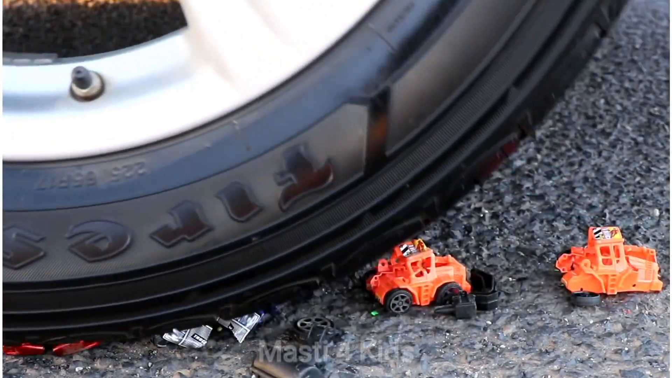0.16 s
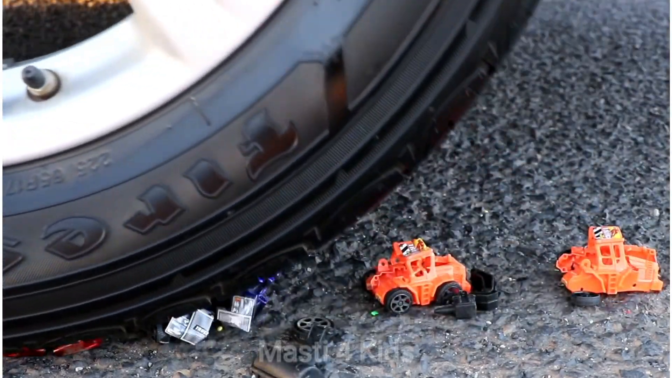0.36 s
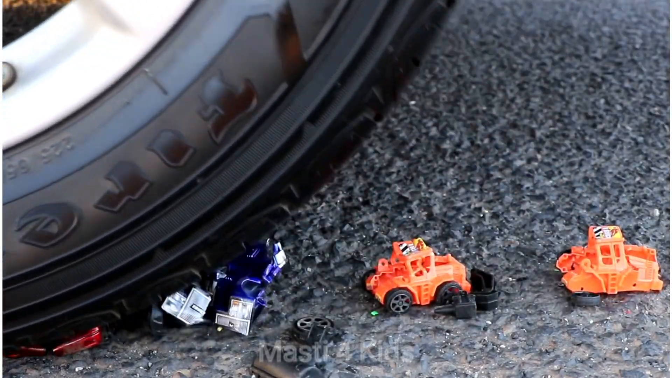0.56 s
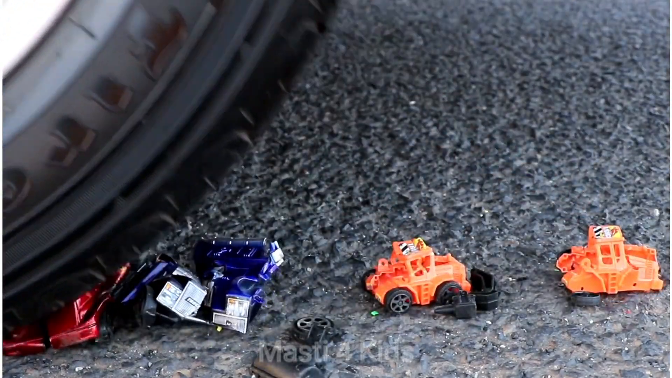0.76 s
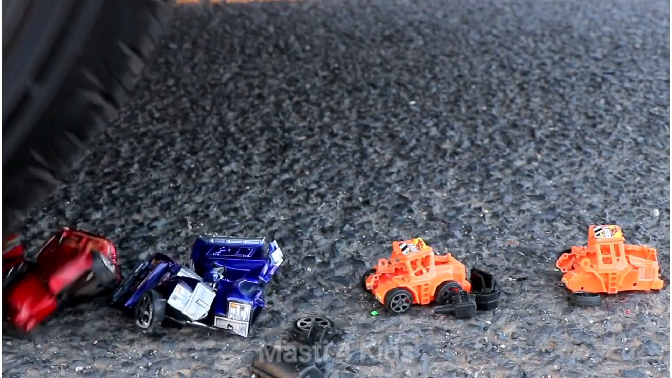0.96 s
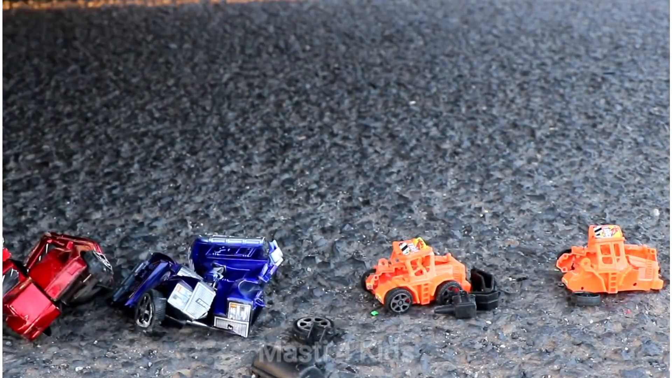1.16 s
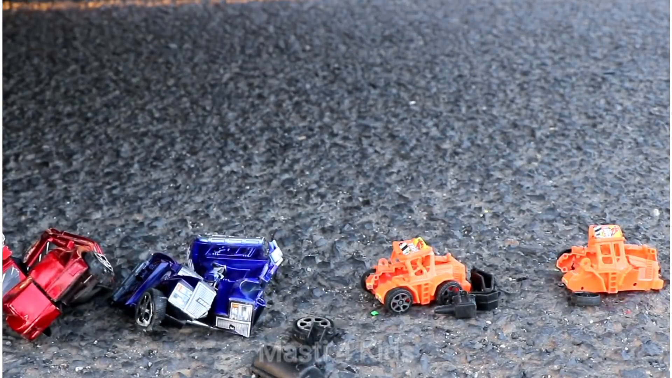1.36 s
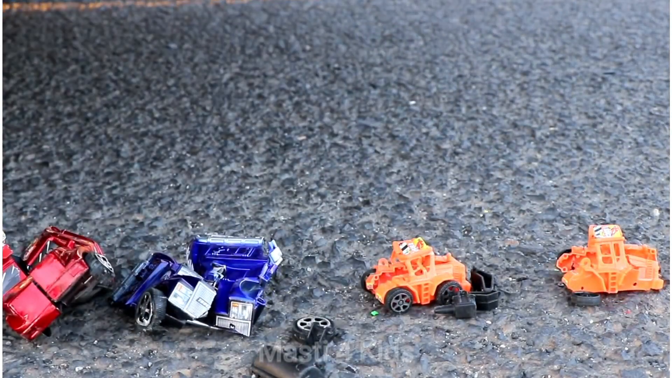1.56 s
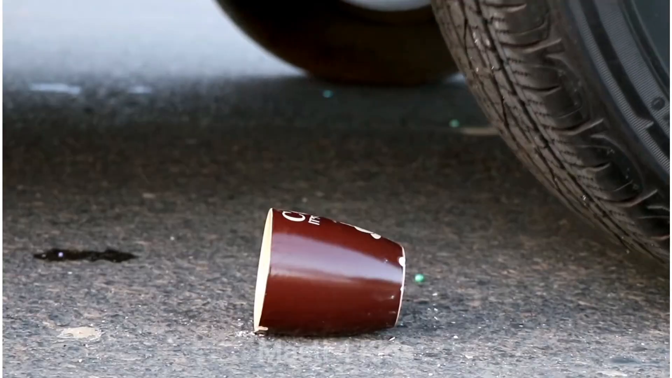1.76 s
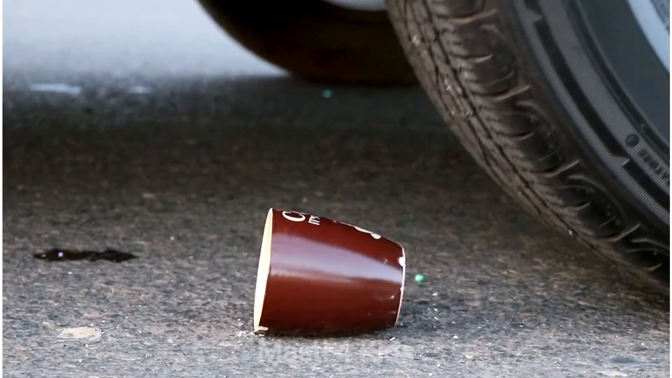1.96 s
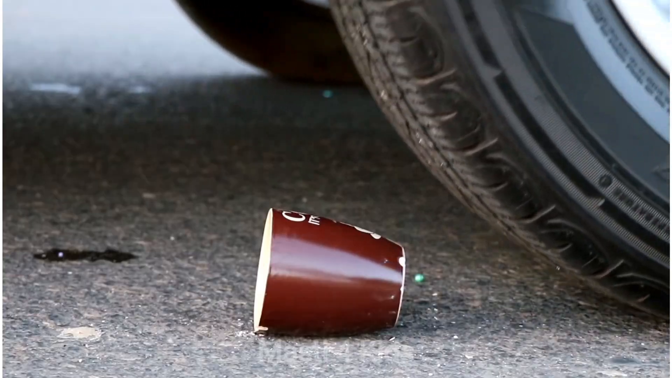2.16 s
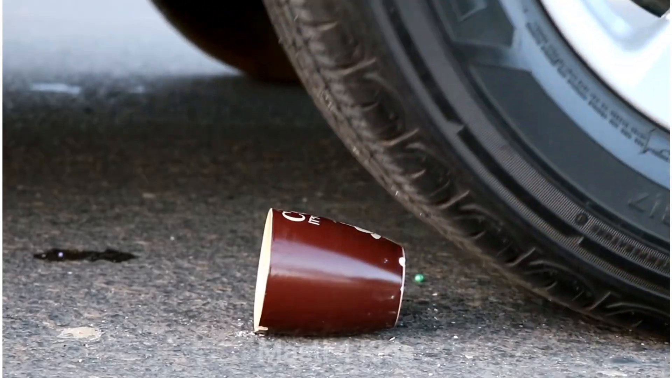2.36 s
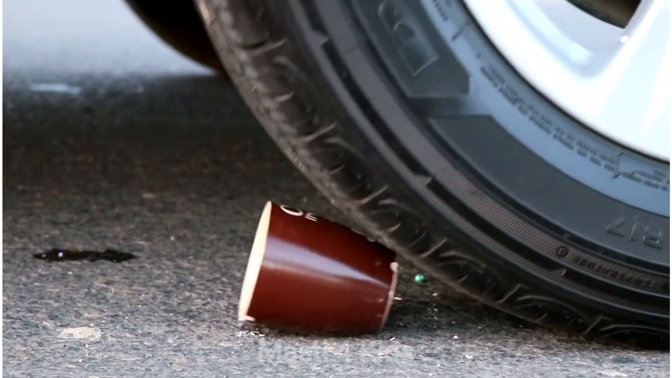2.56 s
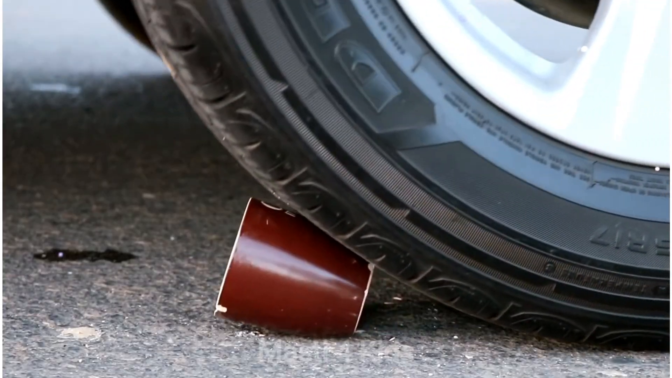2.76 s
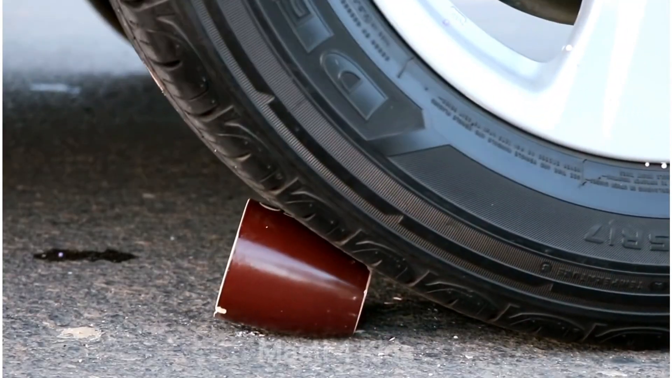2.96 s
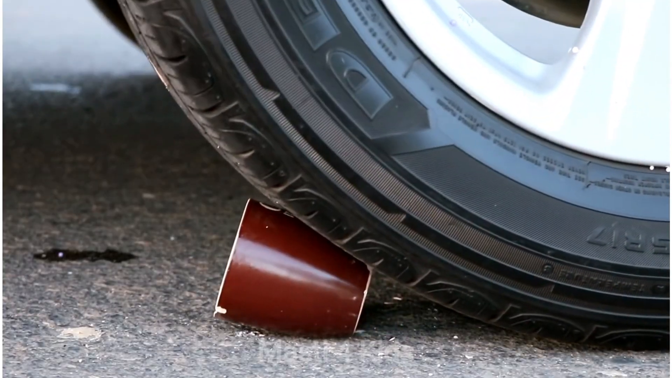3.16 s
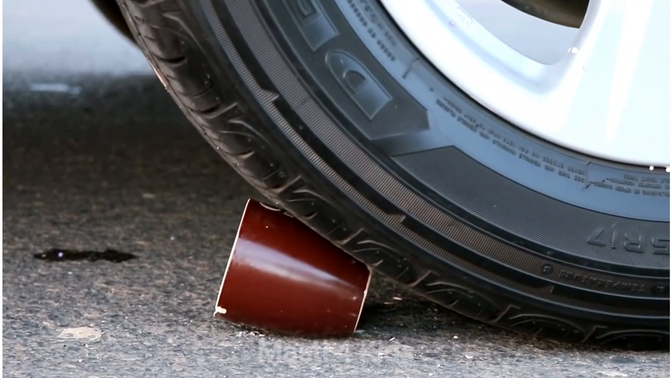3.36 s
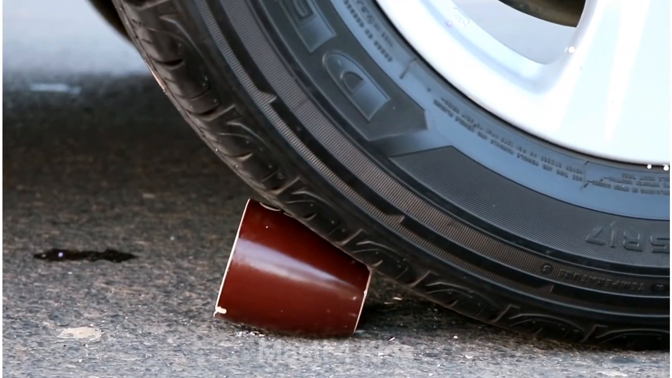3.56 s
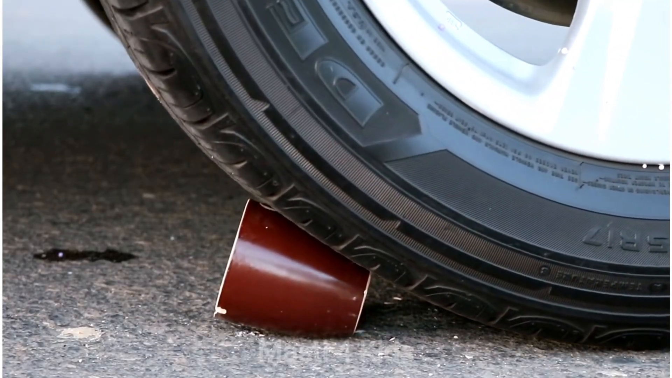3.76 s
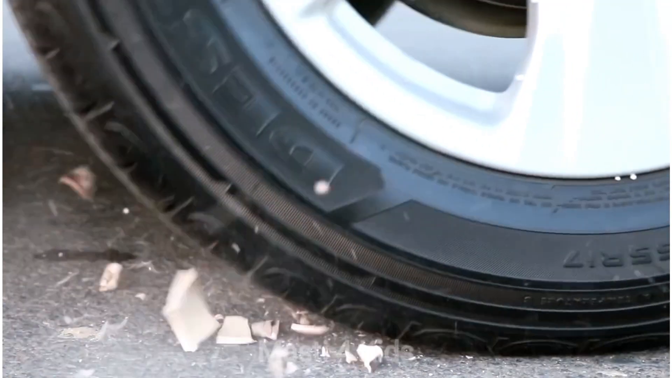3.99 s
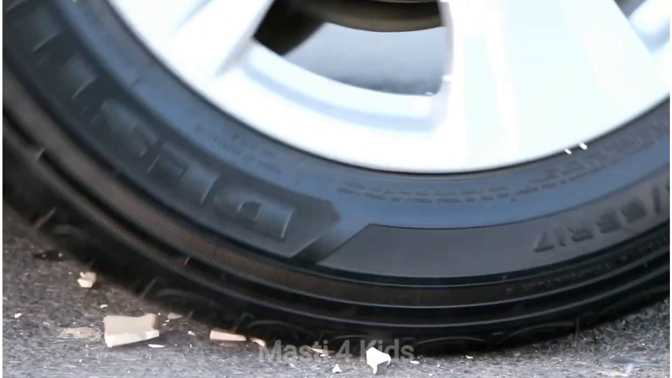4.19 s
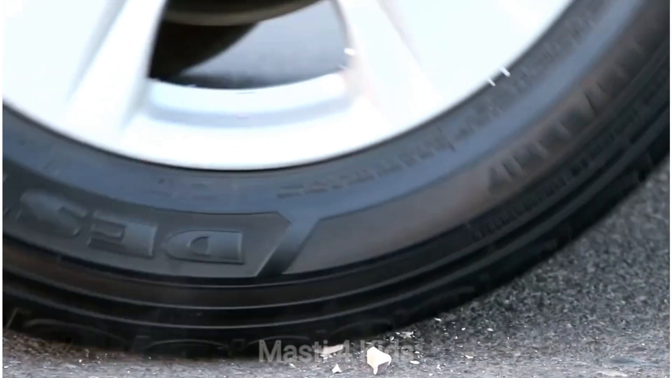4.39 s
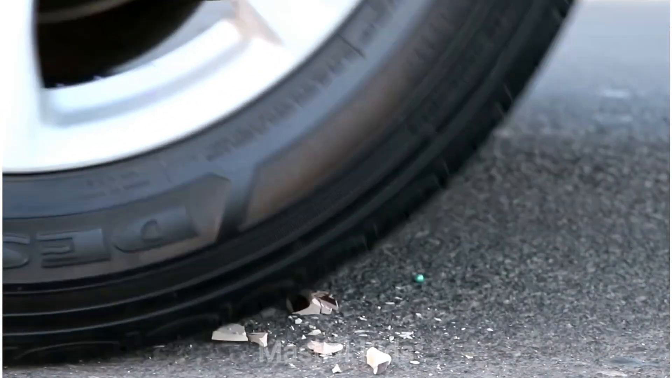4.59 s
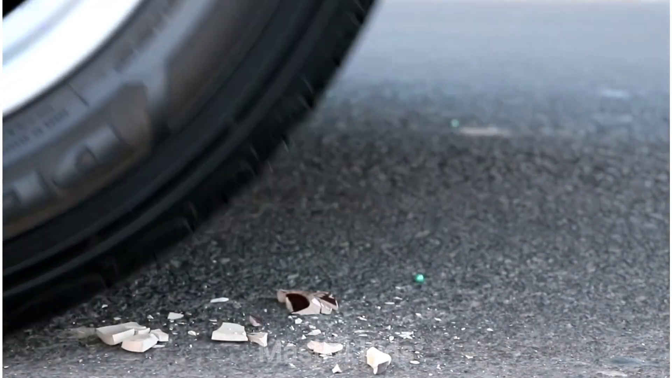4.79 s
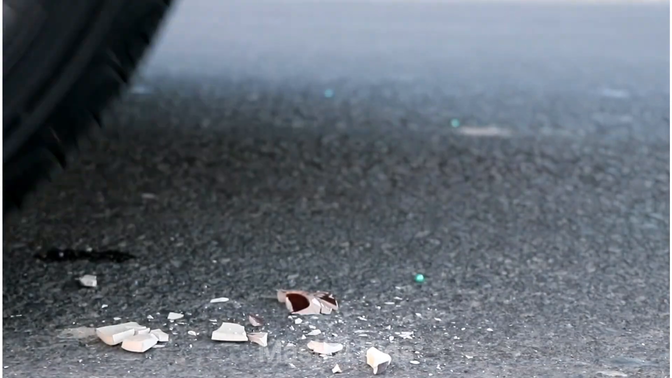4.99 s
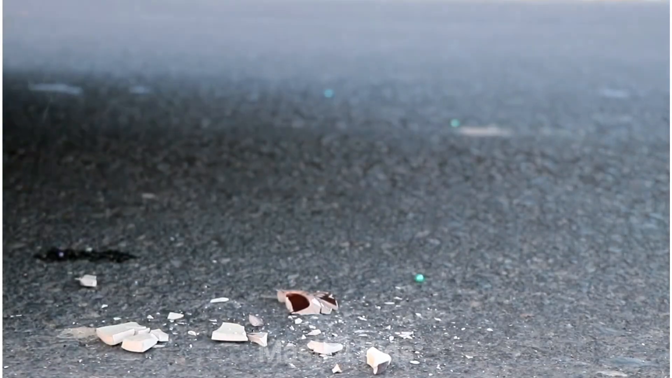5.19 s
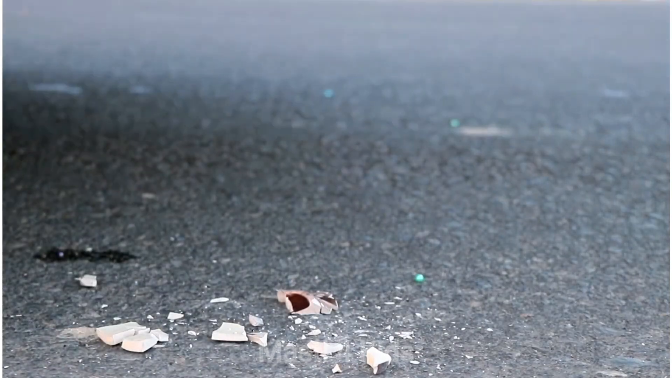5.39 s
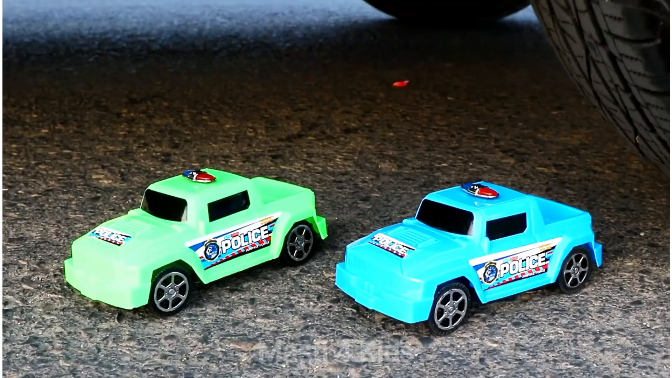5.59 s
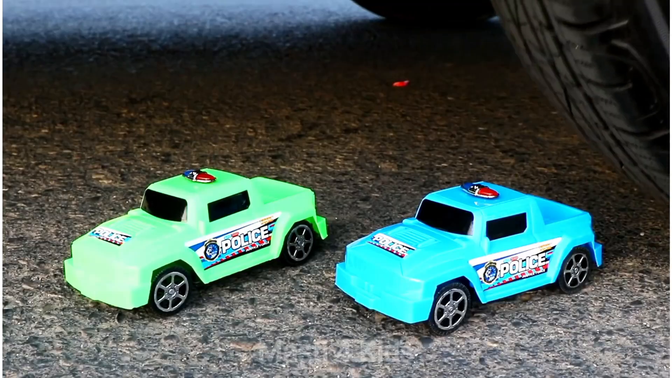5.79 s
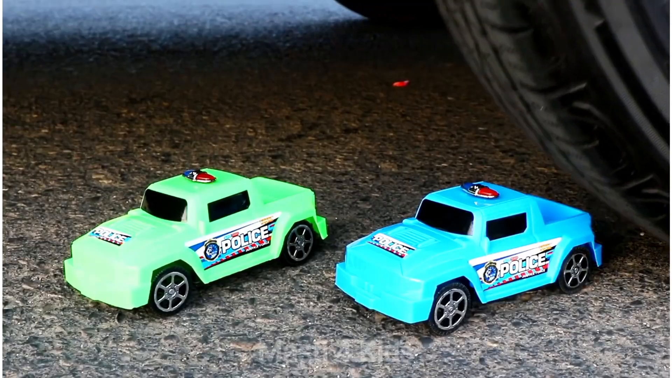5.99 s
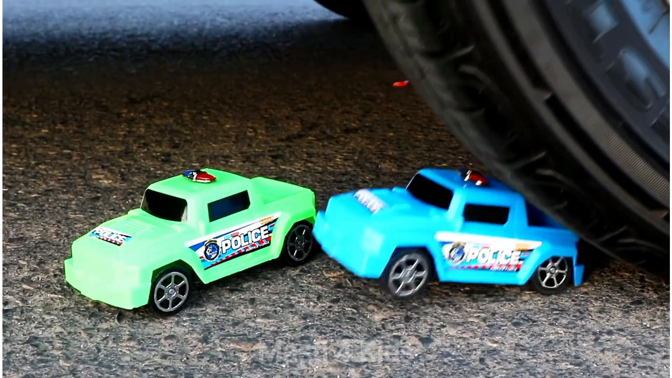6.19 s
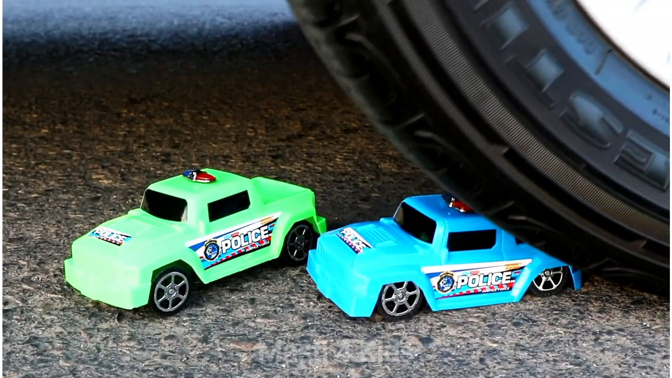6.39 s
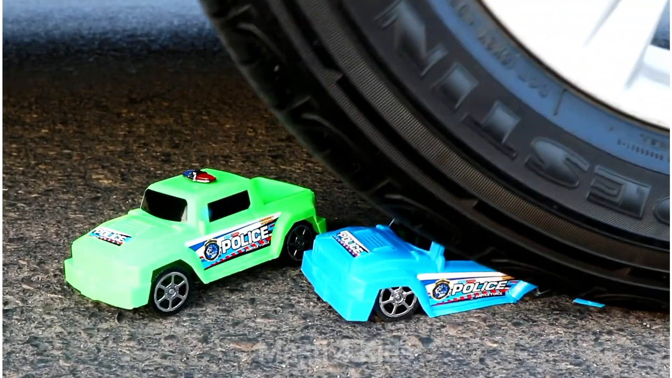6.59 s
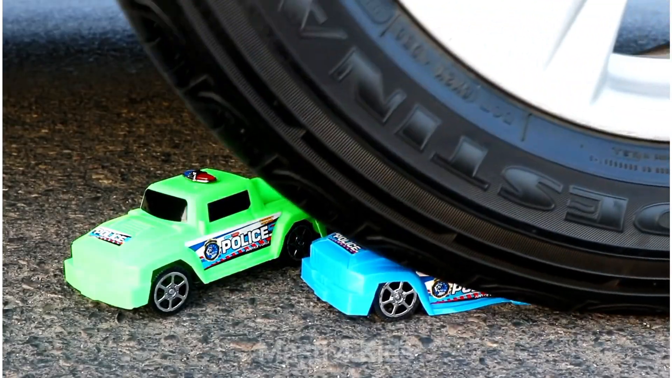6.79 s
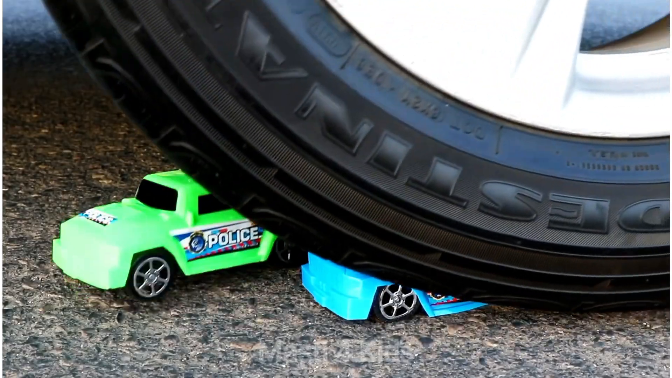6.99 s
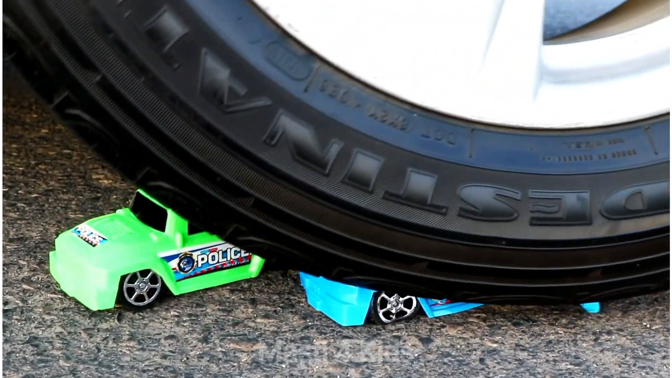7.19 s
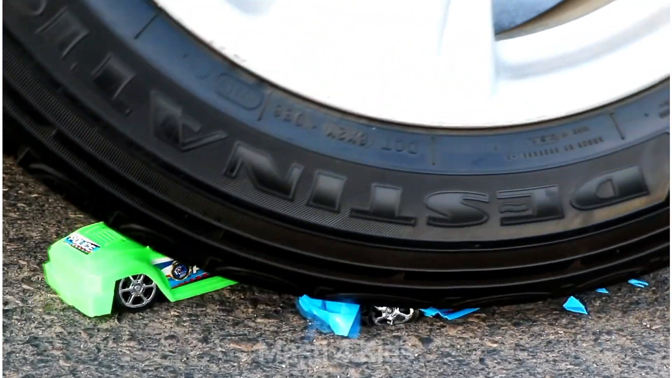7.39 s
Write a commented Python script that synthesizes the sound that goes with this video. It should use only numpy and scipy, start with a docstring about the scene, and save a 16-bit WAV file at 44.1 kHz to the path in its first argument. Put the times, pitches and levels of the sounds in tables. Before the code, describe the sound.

A car tyre crunches over plastic toy cars, bursts a ceramic mug into tinkling shards, then loudly cracks more toys.

```python
"""A car tyre creeps over asphalt, rustling close by against the hum of traffic. First it crushes plastic
toys, which snap back; the wheel hums after hard blows. A far bird chirps. Near 3 s a ceramic mug scrapes
over grit, and at 4 s it bursts: splinters spray, shards skitter and ring, and chips hop to rest.
From about 6.3 s two toy cars crack. The loudest cracks overload the microphone."""
import sys
import numpy as np
from scipy import signal
from scipy.fft import rfft, irfft
from scipy.io import wavfile
from scipy.ndimage import uniform_filter1d

SR = 44100
rng = np.random.default_rng(int(sys.argv[2]) if len(sys.argv) > 2 else 0)


def wav_record(signal):
    """Record a signal, one row per channel, as 16-bit PCM in the file named by sys.argv[1]."""
    frames = np.transpose(np.atleast_2d(signal))
    bounded = np.clip(frames, -1, 1)
    # unit amplitude maps onto the largest positive 16-bit level
    quanta = np.round(bounded * 32767).astype(np.int16)
    wavfile.write(sys.argv[1], SR, quanta)


N = 328545

# Bits of the mug spray out and settle. Each row: time in seconds, level in dB.
SPRAY_LEVELS = [(4.0, -32), (4.3, -32.5), (4.702, -44), (5.0, -56), (5.8, -75)]


def undb(db):
    """Turn decibels into a plain gain."""
    return 10 ** (np.asarray(db) / 20)


def fade(s, t60):
    """Die away over the times s, losing 60 dB every t60 seconds (the ring time)."""
    return np.exp(-np.log(1000) * s / t60)


def band(x, hz, width):
    """A resonance: keep the part of x near hz."""
    return signal.lfilter(*signal.iirpeak(hz, hz / width, fs=SR), x)


def width_for(t60):
    """Width in Hz of a resonance that rings for t60 seconds."""
    return np.log(1000) / np.pi / t60


def low_cut(x, hz, order):
    """Weaken everything below hz."""
    return signal.sosfilt(signal.butter(order, hz, "high", fs=SR, output="sos"), x)


def unit(x):
    """Scale x to an average power of 1."""
    return x / np.sqrt(np.mean(x ** 2))


def noise(n):
    """Plain hiss, n samples long."""
    return rng.standard_normal(n)


def flutter(n, samples):
    """A random wiggle: hiss smoothed over this many samples."""
    return unit(uniform_filter1d(noise(n), size=samples))


def add(out, s, x):
    """Mix x into out, starting at s seconds."""
    i = int(s * SR)
    out[i:i + len(x)] += x[:N - i]


def rings(s, hz, gain, t60):
    """The fading tones of a struck object, added up."""
    return np.sum(gain[:, None] * fade(s, t60[:, None]) * np.sin(2 * np.pi * hz[:, None] * s), axis=0)


def traffic(level_db=-61.5):
    """Distant traffic and an idling car make a low, even noise."""
    # The tone of the noise. Each row: frequency in Hz, relative level in dB.
    spectrum = [(24, -18.5), (45, -9), (100, -6.5), (800, -9.5), (16000, -46.5)]
    # Its rise and fall. Each row: time in seconds, boost in dB.
    swell = [(0, 9), (1.851, 1.5), (5.702, 2), (5.8, 14)]
    hz, db = np.transpose(spectrum)
    freqs = np.maximum(np.fft.rfftfreq(N, 1 / SR), 1)
    shape = undb(np.interp(np.log(freqs), np.log(hz), db))
    hum = unit(irfft(rfft(noise(N)) * shape, N))
    return hum * undb(level_db + np.interp(np.arange(N) / SR, *np.transpose(swell)))


def rustle(grain_db=3.5, patchy_db=3.5, scuff_s=0.029):
    """Countless grains of uneven size sound through the tread and the bent plastic."""
    # Resonances of tread and plastic. Each row: centre in Hz, width in Hz, relative level in dB.
    resonances = [(910, 1100, -4), (2390, 920, -1), (3580, 820, -9), (5500, 2400, -11), (9300, 17000, -19)]
    # The rustle's rise and fall. Each row: time in seconds, level in dB.
    levels = [(0, -37.5), (0.421, -44), (0.578, -44), (0.719, -50.5), (1.3, -67), (3.6, -81.5),
              (3.979, -54), (4.099, -35.5), (4.6, -41), (5.249, -72.5), (5.802, -65), (6.75, -49),
              (7.45, -47)]
    # Freed toys scuff as they unbend. Each row: time of the peak in seconds, level in dB.
    scuff_peaks = [(.875, -50.5), (1.029, -44.5), (1.19, -49.5)]
    out, t = 0, np.arange(N) / SR
    for hz, width, share_db in resonances:
        grains = noise(N) * undb(grain_db * np.minimum(rng.exponential(size=N), 6))
        patches = undb(share_db + patchy_db * flutter(N, 1200))
        out = out + unit(band(band(grains, hz, width), hz, width)) * patches
    scuffs = sum(undb(db) * np.exp(-((t - at) / scuff_s) ** 2) for at, db in scuff_peaks)
    return out * (undb(np.interp(t, *np.transpose(levels))) + scuffs)


def cracks(spread=.3, echo_db=-22, top_db=-15.5, boom_db=-8.5, base_t60=0.032, longer_per_db=0.0628):
    """Each break rings the hollow shell and its walls, with a tearing noise whose treble dies first."""
    # Each row: start in seconds, snap level in dB, pitch of the hollow body in Hz, body level in dB.
    breaks = [(0.0034, -1, 732, 1.5), (0.0142, -13, 940, -10), (0.1545, -5.5, 872, -5),
              (0.182, -11, 680, -42), (0.2227, -10.5, 730, -18), (0.3239, -2.5, 750, 5.5),
              (0.3728, -6, 900, -3), (3.997, -1, 970, 0.5), (4.0228, 3.5, 710, -0.5),
              (4.0451, 2.5, 646, -7), (4.1175, 0, 1140, -44), (4.194, -14, 600, -6),
              (4.2071, -10, 590, -4.5), (4.2928, -14.5, 760, -31), (4.3163, -10, 872, 1.5),
              (4.351, -26, 1061, 6), (4.4342, -13, 910, -22), (4.5329, -11, 662, -3.5),
              (4.5725, -7, 776, 5.5), (4.8199, -35, 930, -25.5), (6.3267, -29, 1010, -21),
              (6.3639, -16.5, 1470, -16), (6.4244, -27.5, 1030, -20.5), (6.4653, -3.5, 920, -50),
              (6.5469, -11, 1017, -4), (6.603, -9, 1210, -21), (6.63, -9, 1100, -4.5),
              (6.6455, 7, 989, 7.5), (6.6721, 2.5, 1046, 4.5), (6.6979, -4.5, 995, 3.5),
              (6.7409, -23, 680, 2.5), (6.7529, -13.5, 784, -18), (6.7596, -39, 750, -7),
              (6.7721, -7, 1100, -3.5), (6.7986, 6.5, 1326, 3.5), (6.8232, 5, 937, 2.5),
              (6.8746, 1, 704, -5.5), (6.8921, 2, 993, 1.5), (6.9564, -24, 784, -16),
              (6.992, -3.5, 750, -4.5), (7.017, -14, 1080, -10), (7.0379, 0, 693, -3),
              (7.145, -31, 810, -19.5), (7.161, -40, 1120, -21), (7.2036, -16.5, 744, -17.5),
              (7.2585, -16, 670, -25), (7.297, -17, 705, -25), (7.3322, -11, 1010, -16),
              (7.3746, -9.5, 840, -10), (7.3824, -1.5, 665, -3.5), (7.4169, -2.5, 915, -5),
              (7.4249, 8.5, 1039, 7.5)]
    out, s = np.zeros(N), np.arange(SR // 4) / SR
    n = N + len(s)
    tear = unit(band(band(noise(n), 2400, 3500), 2400, 6100))
    treble = unit(low_cut(noise(n), 5500, order=2))
    hollow = unit(band(noise(n), 780, 120))
    panel = unit(band(noise(n), 2600, 500))
    for at, snap_db, hz, body_db in breaks:
        t60 = base_t60 * np.exp(longer_per_db * max(snap_db, body_db))  # stronger cracks ring longer
        span = slice(int(at * SR), int(at * SR) + len(s))
        first_toys = at < 1  # these ring more clearly and hum on
        shift, wall_pitch, wall_gain = rng.random((3, 14))
        shell_hz = hz * (1 + spread * np.array([0, -.5 * shift[0], shift[1]]))
        shell = rings(s, shell_hz, np.array([1, .4, .4]), np.full(3, t60))
        walls = rings(s, 1300 * 4.9 ** wall_pitch, .3 * wall_gain, np.full(14, t60 * 0.73))
        boom = unit(band(band(noise(len(s)), hz, 1200), hz, 260 if first_toys else 600))
        if first_toys:
            shell += 0.04 * fade(s, 0.3) * hollow[span]
            walls += 0.31 * fade(s, 0.074) * panel[span]
        echo = undb(echo_db) * fade(s, 0.12) * (1 - fade(s, 0.042))  # off the car body and the ground
        body = shell + (undb(boom_db) * fade(s, t60 * 1.3) + echo) * boom
        snap = walls + (fade(s, t60 * 0.55) + echo) * tear[span]
        snap += undb(top_db) * (fade(s, t60 * 0.32) + 0.05 * fade(s, t60 * .7)) * treble[span]
        add(out, at, undb(body_db) * body + undb(snap_db) * snap)
    return low_cut(out, 330, order=3)  # toys are too small to give off bass


def wheel(blows, crunch_db=10.0, lead_s=0.021, sag=.45):
    """Blows set the wheel humming. When something folds under it, it crunches, then the rubber thumps."""
    # The wheel drops. Each row: start in seconds, level in dB, starting pitch in Hz.
    drops = [(4.057, -13, 166), (6.698, -9.5, 205), (7.427, -30, 320)]
    # Tones of the tyre's air and the rim. Each row: pitch in Hz, gain in dB, ring time in seconds.
    tones = [(213, 1, 1.5), (608, -3, 1.1)]
    out, s = np.zeros(N), np.arange(SR // 2) / SR
    for at, db, hz in drops:
        crunch = fade(s, 0.11) * unit(band(noise(len(s)), 360, 320))
        sinking = 1 - sag * (1 - fade(s, 0.18))
        thud = np.sin(2 * np.pi * hz * np.cumsum(sinking) / SR)
        thud += .6 * unit(band(noise(len(s)), hz * 0.7, hz))
        add(out, at - lead_s, undb(db + crunch_db) * crunch)
        add(out, at, undb(db) * fade(s, 0.26) * (1 - fade(s, 0.023)) * thud)
    shaking = 2 * out + .5 * blows
    return out + sum(undb(db) * band(shaking, hz, width_for(t60)) for hz, db, t60 in tones)


def ticks(spit_db=-12.5, t60=.012):
    """Small bits snap or tick on the asphalt: dry clicks with a spit of treble."""
    # Each row: start in seconds, level in dB.
    hits = [(0.0444, -18), (.0787, -37), (0.1342, -21), (0.75, -25.5), (0.7606, -25), (0.7693, -23),
            (1.011, -23), (1.0865, -33), (1.1633, -31.5), (1.1976, -27.5), (4.525, -11.5), (4.612, -20),
            (4.763, -18.5), (4.942, -30.5), (5.035, -31.5), (5.317, -37), (6.2946, -33), (6.321, -36),
            (6.338, -19.5), (6.421, -26.5), (7.2204, -21.5), (7.329, -32), (7.354, -25), (7.4, -7)]
    clicks, spit, s = np.zeros(N), np.zeros(N), np.arange(SR // 20) / SR
    for at, db in hits:
        hz = 1900 * 3.0 ** rng.random(7)
        add(clicks, at, undb(db) * rings(s, hz, np.full(7, .4), np.full(7, t60)))
        add(spit, at, undb(db + spit_db) * fade(s, t60) * noise(len(s)))
    return band(clicks, 5000, 6300) + band(spit, 7300, 9000)


def bird():
    """A far bird whistles short, slightly rough, gliding notes."""
    # Each row: start in seconds, length in seconds, first and last pitch in Hz, level in dB.
    notes = [(1.35, .1, 8700, 9100, -56), (1.42, .07, 7600, 8200, -58), (1.47, .1, 5050, 5350, -54),
             (1.53, .05, 4400, 4350, -55)]
    out = np.zeros(N)
    for at, length, from_hz, to_hz, db in notes:
        n = int(length * SR)
        rasp = 1 + .5 * flutter(n, 100)
        whistle = np.sin(2 * np.pi * np.cumsum(np.linspace(from_hz, to_hz, n)) / SR)
        add(out, at, undb(db) * np.hanning(n) * rasp * whistle)
    return out


def mug(grit_db=5.5, drag_t60=0.069):
    """The mug rings as it is tapped, then slides and knocks over grit; each knock ends in a scrape."""
    # The mug's own tones. Each row: pitch in Hz, gain in dB, ring time in seconds.
    tones = [(984, 0, .05), (2350, -6, .015), (2900, 2, .07), (3801, -2, .06), (7300, -16, .03),
             (8204, -14, .04), (10660, -13, .08), (13940, -12, .04)]
    # The tread first catches the mug's rim, which rings rough and long.
    # In order: start in seconds, level in dB, which tones ring, how many times longer they ring.
    rim_tap = 2.707, -53, (2, 5, 6), 5.
    # The mug slides. Each row: time in seconds, relative level in dB.
    slide = [(2.79, -75.5), (2.851, -49), (2.948, -87)]
    # Grit shifts the whole mug. Each row: start in seconds, strength in dB.
    knocks = [(2.845, -39.5), (2.855, -38), (2.884, -17), (2.9, -24), (2.94, -32), (2.969, -26),
              (3.061, -24.5)]
    push, s = np.zeros(N), np.arange(SR // 4) / SR
    rub = undb(np.interp(np.arange(N) / SR, *np.transpose(slide), -np.inf, -np.inf))
    for at, db in knocks:
        add(push, at, undb(db) * (fade(s, 0.0077) + 0.27 * fade(s, drag_t60)))
    out = 0.11 * push * noise(N)
    for hz, db, t60 in tones:
        grit = unit(noise(N) * undb(grit_db * np.minimum(rng.exponential(size=N), 5)))
        out += undb(db) * band((0.99 * push + 40 * rub) * grit, hz, width_for(t60))
    rasp = 1 + .7 * flutter(len(s), 150)
    at, tap_db, ringing, longer = rim_tap
    hz, db, t60 = np.array(tones)[list(ringing)].T
    add(out, at, undb(tap_db) * rasp * rings(s, hz, undb(db), t60 * longer))
    return out


def splinters(per_second=140., boost_db=15.0, size_db=5., click_db=-11.):
    """Tiny bits of the mug land: most only rattle, some ring briefly at a high pitch of their own."""
    out, s = np.zeros(N), np.arange(SR // 16) / SR
    times, levels = np.transpose(SPRAY_LEVELS)
    length = times[-1] - times[0]
    for when, pitch_a, pitch_b, sustain, size, high_pitch in rng.random((int(per_second * length), 6)):
        at = times[0] + when * length
        hz = np.array([2200 * 3.2 ** pitch_a, 2200 * 1.6 ** pitch_b, 5000 * 5.2 ** high_pitch])
        t60 = np.array([.005, .005, 0.0056 + 0.034 * sustain ** 2])
        ring = rings(s, hz, np.array([1, 1, .15]), t60)
        click = undb(click_db) * fade(s, .003) * noise(len(s))
        db = np.interp(at, times, levels) + boost_db + size_db * np.log(.05 + size)
        add(out, at, undb(db) * (ring + click))
    return out


def shards(scatter_db=4., chatter_db=12.5, chatters_per_s=55., wobble_db=2.4, detune=.002, still_s=5.82):
    """Each bounce stops a shard's old ring and starts a new one; in between it rocks and chatters."""
    # Bounces of four large shards, one list each. Each row: start in seconds, level in dB.
    shard_bounces = [
        [(4.0342, -20), (4.3136, -20.5), (4.3755, -27), (4.4932, -41), (4.5461, -17), (4.5994, -22),
         (4.7626, -28.5), (4.8823, -29), (5.0509, -39), (5.1098, -30.5), (5.3418, -26), (5.795, -50.5)],
        [(4.0367, -4), (4.1405, -11), (4.1744, -8.5), (4.3101, -9), (4.3755, -16.5), (4.4333, -24),
         (4.5476, -19.5), (4.6833, -31), (4.7631, -26), (4.8394, -29.5), (4.9217, -37), (5.3844, -36.5)],
        [(4.4927, -19.5), (4.6528, -33), (5.1672, -29.5), (5.2144, -38), (5.3208, -38.5), (5.4026, -36),
         (5.6206, -49)],
        [(4.0362, -8), (4.1294, -25.5), (4.2924, -22.5), (4.4323, -31)],
    ]
    # Their tones, one list each. Each row: pitch in Hz, gain in dB, ring time in seconds.
    shard_tones = [
        [(4775, 0, .48), (4683, -17, .4), (8445, -22, .12), (12850, -32, .12)],
        [(5690, 0, .14), (10450, -16, .1), (13930, -28, .1)],
        [(5276, 0, .25), (9921, -11, .1), (11060, -18, .1), (13070, -22, .1)],
        [(2972, 0, .3), (4990, 4, .1), (5862, 5, .08), (14250, -12, .08)],
    ]
    t, out = np.arange(N) / SR, np.zeros(N)
    times, levels = np.transpose(SPRAY_LEVELS)
    busy = undb(np.interp(t, times, levels)) * (t > times[0]) * (t < times[-1])
    for bounces, tones in zip(shard_bounces, shard_tones):
        at, ring_db = np.transpose(bounces)
        latest = np.searchsorted(at, t) - 1
        ringing = (latest >= 0) & (t < still_s)
        since = (t - at[latest]) * ringing
        rocking = busy * (t < at[-1] + .1) * (rng.random(N) < chatters_per_s / SR)
        bend = 1 + detune * noise(len(at))  # how it lies bends the pitch a little
        for j, (hz, db, t60) in enumerate(tones):
            share_db = (j > 0) * scatter_db * noise(len(at))  # where it lands sets the overtones
            loudness = undb((ring_db + db + share_db)[latest]) * fade(since, t60) * ringing
            wobble = undb(wobble_db * flutter(N, 700))  # it grazes the grit
            tone = np.sin(2 * np.pi * hz * np.cumsum(bend[latest]) / SR)
            out += uniform_filter1d(loudness, size=20) * wobble * tone
            width = width_for(.5 * t60)  # touching the ground halves the ring time
            out += undb(chatter_db) * SR / width / 60 * band(rocking * noise(N), hz, width)
    return out


def hopping_chips(landings=7, loss_db=2, click_hz=3350, click_t60=0.015):
    """Chips hop to rest; each landing clicks on the asphalt and rings the chip anew."""
    # Each row: first landing in seconds, first flight in seconds, flight time kept per hop, level in dB.
    chips = [(4.7465, 0.011, 0.77, -30.5), (4.805, 0.034, 0.68, -24), (5.088, 0.022, 0.87, -29.5),
             (5.21, 0.017, .93, -35), (5.341, 0.011, 1, -33.5)]
    # A chip's tones. Each row: pitch in Hz, greatest gain in dB, ring time in seconds.
    tones = [(8400, -10, 0.084), (10100, -21, 0.052)]
    out, s = np.zeros(N), np.arange(SR // 10) / SR
    hz, ring_db, t60 = np.transpose(tones)
    for at, flight, shrink, db in chips:
        for hop, chance in enumerate(rng.random((landings, 7))):
            click = rings(s, click_hz * 1.9 ** (chance[:5] - .5), np.full(5, .5), np.full(5, click_t60))
            ring = rings(s, hz, undb(ring_db) * chance[5:], t60)
            lands_at = at + flight * np.sum(shrink ** np.arange(hop))
            add(out, lands_at, undb(db - hop * loss_db) * (click + ring))
    return out


def scene():
    """Mix every sound into one channel; the cracks also shake the wheel."""
    blows = cracks()
    debris = shards() + splinters() + ticks() + hopping_chips()
    return (blows + wheel(blows) + mug() + debris + bird() + rustle() + traffic())[None]


def record(dry, ceiling=.64, top_hz=16800):
    """The microphone drops the deepest bass, flattens the loudest peaks and cuts the highest treble."""
    clipped = np.clip(low_cut(dry, 35, order=1), -ceiling, ceiling)
    softened = signal.sosfilt(signal.butter(1, 17500, fs=SR, output="sos"), clipped)
    return signal.sosfilt(signal.cheby2(14, 90, top_hz, fs=SR, output="sos"), softened)


dry = scene()
out = record(dry)
wav_record(out)
```